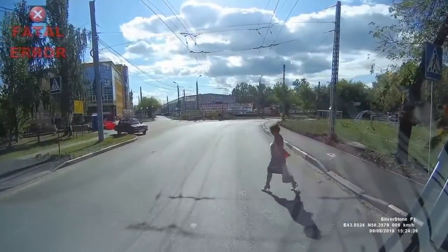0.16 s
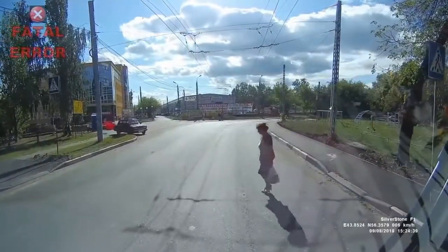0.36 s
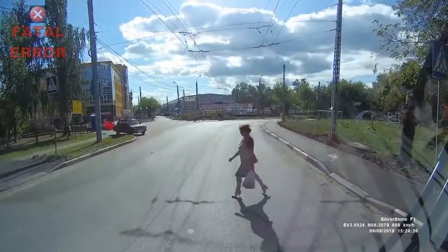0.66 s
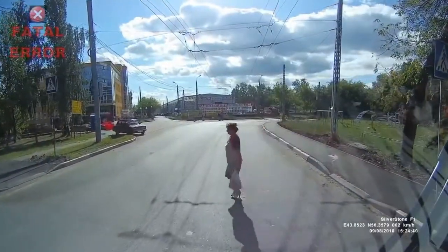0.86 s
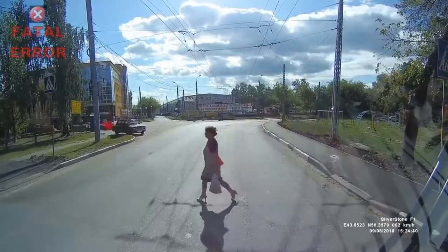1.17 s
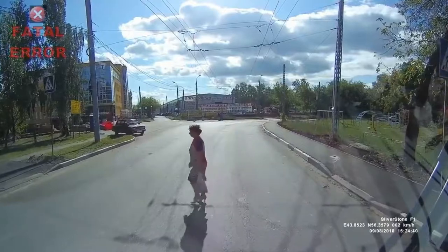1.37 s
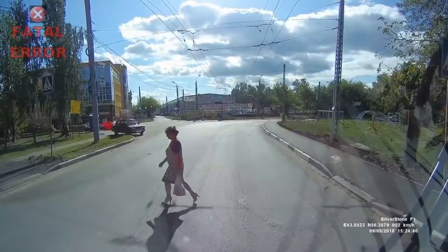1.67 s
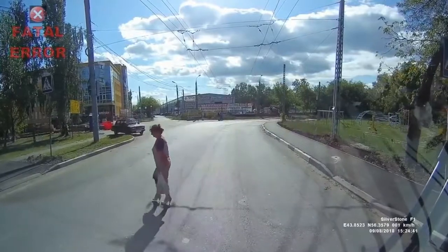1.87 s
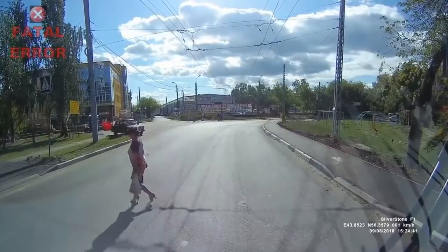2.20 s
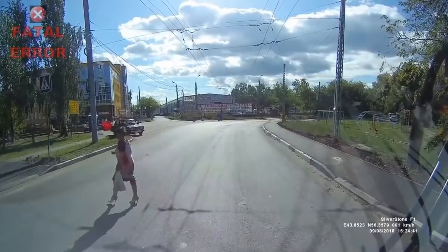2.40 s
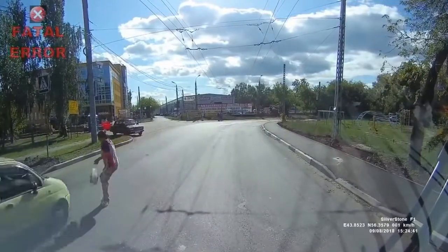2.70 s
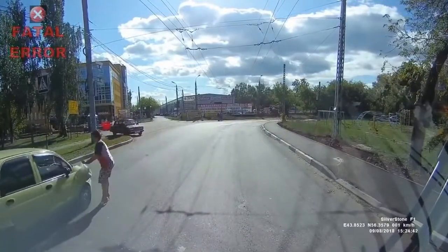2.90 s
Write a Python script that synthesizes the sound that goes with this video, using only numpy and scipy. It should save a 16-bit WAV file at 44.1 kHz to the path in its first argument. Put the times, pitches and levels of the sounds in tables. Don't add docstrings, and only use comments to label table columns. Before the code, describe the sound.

Skidding car tyres screech in stuttering bursts over the low, lumpy idle of a vehicle cab.

```python
import sys
import numpy as np
from scipy import signal
from scipy.fft import rfft, irfft, next_fast_len
from scipy.io import wavfile
from scipy.ndimage import uniform_filter1d, map_coordinates

SR = 44100
rng = np.random.default_rng(int(sys.argv[2]) if len(sys.argv) > 2 else 0)


def voltage_ratio(decibels):
    exponent = np.asarray(decibels, float) / 20
    return 10 ** exponent


def master(y):
    cut = np.clip(np.atleast_2d(y).T, -1, 1)
    pcm = np.round(cut * 32767)
    wavfile.write(sys.argv[1], SR, pcm.astype(np.int16))


N = 134505
T = np.arange(N) / SR


def unit(x):
    return x / np.sqrt(np.mean(np.abs(x) ** 2) + 1e-20)


def along(points, hz):
    f, db = np.transpose(points)
    return voltage_ratio(np.interp(np.log(hz + 1), np.log(f + 1), db, -120, -120))


def curves(rows):
    s, *columns = np.transpose(rows)
    return [np.interp(T, s, column) for column in columns]


def wobble(rate):
    return map_coordinates(rng.standard_normal(4000), [T * np.clip(rate, .1, 1200)])


def filtered(x, response):
    m = next_fast_len(N + SR // 2)
    return irfft(rfft(x, m) * response(np.fft.rfftfreq(m, 1 / SR)), m)[:N]


def noise(spectrum):
    return unit(filtered(rng.standard_normal(N), lambda f: along(spectrum, f)))


# f/Hz, level/dB (per Hz)
HUM_COLOUR = [(30, -6), (60, 0), (200, -3), (260, -15)]


def hum(load_db):
    return voltage_ratio(-50 + 2.1 * load_db) * noise(HUM_COLOUR)


def knock():
    start_s, level_db, pitch_hz, t60_s = .505, -28, 289, 0.083
    t = np.clip(T - start_s, 0, None)
    partials = np.sin(2 * np.pi * pitch_hz * t) + 0.58 * np.sin(2 * np.pi * 1.6 * pitch_hz * t)
    return voltage_ratio(level_db - 60 * t / t60_s) * partials * (1 - np.exp(-t / 0.0035))


# f/Hz, level/dB (per Hz)
INTAKE_COLOUR = [(200, -17), (300, -2), (700, 3), (1000, -11), (1400, -30.5)]


def intake(load_db):
    return voltage_ratio(-60.5 + 3.3 * load_db) * noise(INTAKE_COLOUR)


# f/Hz, level/dB (per Hz)
ROAR_COLOUR = [(130, -21.5), (220, -12), (257, -15), (389, -9.5), (464, -18), (979, -12.5), (1230, -9.5),
               (1630, -16.5), (2300, -33), (2990, -72.5), (5060, -120)]


def roar(count, load_db):
    pulse = 1 + 0.14 * np.cos(2 * np.pi * (count - 0.74))
    return voltage_ratio(-46.5 + 1.26 * load_db + 1.3 * wobble(12)) * pulse * noise(ROAR_COLOUR)


# f/Hz, level/dB (per Hz)
CLATTER_COLOUR = [(1900, -43), (2350, -12.5), (2700, -3.2), (4400, -3.5), (4700, -11), (6500, -23),
                  (8300, -21), (8600, -56)]
# t/s, level/dB (peak)
LOUD_TAPS = [
    (0.6963, -49),
    (0.8185, -35.5),
    (0.9403, -59.5),
    (1.1004, -52.5),
]


def clatter(count, load_db):
    pulse = 1 + 0.25 * np.cos(2 * np.pi * (count - 0.74))
    taps = sum(voltage_ratio(db + 44) * np.exp(-np.abs(T - s - .004) / .007) for s, db in LOUD_TAPS)
    return voltage_ratio(-61 + load_db + 1.5 * wobble(10)) * (pulse + taps) * noise(CLATTER_COLOUR)


def boom(rate, count, load_db):
    resonance_hz, width_hz, peak_db = 43, 4.6, 7
    swell_db = peak_db * np.exp(-((rate - resonance_hz) / width_hz) ** 2)
    level_db = -37 + 0.45 * load_db + swell_db + .6 * wobble(5)
    return -voltage_ratio(level_db) * np.sqrt(2) * np.cos(2 * np.pi * count)


# f/Hz, width/Hz, level/dB
PIPE_MODES = [(164, 14, 1), (200, 12, 0), (390, 70, -24)]


def pipe_ring(f):
    delay_s, total = .0096, 0
    for k, (centre, width, db) in enumerate(PIPE_MODES):
        total = total + (-1) ** k * voltage_ratio(db) * 1j * f * width / (centre ** 2 - f * f + 1j * f * width)
    return np.exp(-2j * np.pi * f * delay_s) * total


def puff_pulse(f):
    return np.exp(-(f / 135) ** 2) * f * f / (f * f + 40 ** 2)


def rebound(f):
    return 1j * f / (118 ** 2 - f * f + 1j * f * 35)


def exhaust(rate, count, load_db):
    at = np.flatnonzero(np.diff(np.floor(count))) + 1
    weak = np.floor(count[at]) % 2 == 1
    size = voltage_ratio(.7 * rng.standard_normal(200)[:len(at)])
    above_idle = rate[at] - rate[0]
    weak_puff = np.clip(.22 + .02 * above_idle, 0, 1)
    puffs, rings = np.zeros(N), np.zeros(N)
    puffs[at] = -size * voltage_ratio(-0.18 * above_idle) * np.where(weak, weak_puff, 1)
    rings[at] = size * voltage_ratio(-0.26 * above_idle) * np.where(weak, .3, 1)
    mix = voltage_ratio(-40) * unit(filtered(puffs, puff_pulse))
    mix = mix + voltage_ratio(-40) * unit(filtered(rings, pipe_ring))
    mix = mix + voltage_ratio(-44) * unit(filtered(puffs, rebound))
    return voltage_ratio(0.12 * load_db) * filtered(mix, lambda f: 1 / (1 + (f / 450) ** 4))


# t/s, f/Hz (firings)
BLIP = [
    (1.42, 24.9),
    (1.618, 31.5),
    (1.718, 36.8),
    (1.804, 41.0),
    (2.0, 43.9),
    (2.182, 42.1),
    (2.378, 36.5),
    (2.446, 33.9),
    (2.704, 28.5),
    (3.05, 25.5),
]
# t/s, level/dB
WORK = [
    (0, 1.5),
    (1.4, 1.5),
    (1.6, 4),
    (1.78, 6),
    (2.0, 6.5),
    (2.2, 4),
    (2.4, 3.5),
    (2.7, -0.5),
    (3.05, 4),
]


def engine():
    idle_hz, first_firing_s = 25.098, .0693
    (rate,), (load_db,) = curves(BLIP), curves(WORK)
    rate = np.where(T < BLIP[0][0], idle_hz, rate)
    count = np.cumsum(rate) / SR
    count = count - count[round(first_firing_s * SR)]
    air = hum(load_db) + intake(load_db)
    works = roar(count, load_db) + clatter(count, load_db)
    return air + works + boom(rate, count, load_db) + exhaust(rate, count, load_db)


OVERTONE_LEVELS = [-25.5, -39]


def tyre(rows, width_hz, wander_hz, spread):
    hz, db = curves(rows)
    grip = voltage_ratio(db) * (T > rows[0][0]) * (T <= rows[-1][0])

    def flutter(rate):
        return wobble(rate) + 1j * wobble(rate)

    phases = []
    for side in (-1, 1):
        patch_hz = hz + side * spread * 55 + wander_hz * wobble(45)
        phases.append(2 * np.pi * np.cumsum(patch_hz) / SR)
    tone = unit(sum(np.real((1.2 + flutter(width_hz)) * np.exp(1j * phase)) for phase in phases))
    for k, level_db in enumerate(OVERTONE_LEVELS, start=2):
        rough = flutter(2.2 * k * width_hz)
        tone = tone + voltage_ratio(level_db) * np.real(rough * np.exp(1j * k * phases[0]))
    return grip * tone, grip


# f/Hz, level/dB (per Hz)
SCRUB_COLOUR = [(290, -69.5), (500, -32.5), (717, -39), (962, -23), (1040, -18.5), (1200, -6.5),
                (1400, -3.5), (2100, -40.5), (2730, -74), (4620, -120)]


def scrub(force):
    return force * voltage_ratio(-5 + 1.7 * wobble(40)) * noise(SCRUB_COLOUR)


# f/Hz, level/dB (per Hz)
GRIT_COLOUR = [(1260, -33.5), (2150, -20), (2510, -5.5), (2880, 3.5), (3580, -12.5), (3980, -7),
               (4440, -14.5), (5770, -48.5), (9770, -120)]


def grit(force):
    return np.abs(force) ** 0.77 * voltage_ratio(-28.5 + wobble(25)) * noise(GRIT_COLOUR)


# t/s, f/Hz, level/dB
FAR_TYRE = [
    (2.05, 1400, -38.5),
    (2.1, 1350, -24),
    (2.17, 1340, -20),
    (2.21, 1380, -28.5),
    (2.4, 1420, -54),
    (2.43, 1400, -18.5),
    (2.6, 1390, -17.5),
    (2.68, 1420, -33.5),
    (2.77, 1400, -24.5),
    (3.05, 1405, -21.5),
]
# t/s, f/Hz, level/dB
NEAR_FIRST_GRIP = [
    (2.235, 1480, -38.5),
    (2.255, 1363, -19),
    (2.275, 1288, -10.5),
    (2.292, 1297, -21.5),
    (2.31, 1190, -10.5),
    (2.355, 1160, -20),
    (2.392, 1166, -10.5),
    (2.42, 1234, -20),
    (2.47, 1230, -32),
]
# t/s, f/Hz, level/dB
NEAR_SECOND_GRIP = [
    (2.61, 1205, -35.5),
    (2.63, 1205, -16),
    (2.67, 1204, -18),
    (2.76, 1286, -19),
    (2.84, 1250, -33.5),
    (2.875, 1263, -19),
    (2.905, 1070, -28.5),
    (2.935, 860, -32),
    (2.95, 830, -43.5),
]


def skid():
    far, far_grip = tyre(FAR_TYRE, width_hz=130, wander_hz=30, spread=.8)
    first, first_grip = tyre(NEAR_FIRST_GRIP, width_hz=90, wander_hz=20, spread=.1)
    second, second_grip = tyre(NEAR_SECOND_GRIP, width_hz=105, wander_hz=25, spread=.3)
    smooth_s = 0.071
    force = uniform_filter1d(far_grip + first_grip + second_grip, size=int(smooth_s * SR))
    return far + first + second + scrub(force) + grit(force)


def scene():
    return (knock() + engine() + skid())[None]


def squeeze(x):
    ceiling = .68
    level = uniform_filter1d(np.abs(signal.hilbert(x, next_fast_len(N))[:N]), size=60)
    return x / (1 + (level / ceiling) ** 4) ** (1 / 4)


# low f/Hz, high f/Hz, reluctance [1]
SHY_BANDS = [(4600, 4800, -.9), (4800, 5200, 0), (5200, 5700, 0), (5700, 6300, -.1), (6300, 6900, .4),
             (6900, 7500, 1.5), (7500, 8300, 1.6)]
SHUT_TIMES = [2.25, 2.368]


def treble_gate(x):
    top_hz, shut_hz, shut_half_s = 4600, 3900, .02
    fade_out = np.clip((N - np.arange(N)) / 90, 0, 1)
    hz, t, z = signal.stft(x * fade_out, SR, nperseg=2048)

    def band_db(low, high):
        power = np.abs(z[(hz > low) & (hz < high)]) ** 2
        return 10 * np.log10(np.sum(power, axis=0) + 1e-12)

    bright = band_db(top_hz, 7000)
    busy = np.clip(band_db(900, 1800) + 34, 0, None)
    urge = (bright - np.median(bright)) / 4.5 - busy / 6 + .7 * rng.standard_normal(len(t))
    keep = (hz < top_hz)[:, None] * np.ones(len(t))
    for low, high, reluctance in SHY_BANDS:
        is_open = urge + .7 * rng.standard_normal(len(t)) > reluctance
        keep = keep + ((hz >= low) & (hz < high))[:, None] * is_open
    in_dropout = np.min(np.abs(t[:, None] - SHUT_TIMES), axis=1) < shut_half_s
    keep = keep * ~((hz > shut_hz)[:, None] & in_dropout)
    return signal.istft(z * keep, SR, nperseg=2048)[1][:N]


def low_pass(x):
    return signal.sosfilt(signal.butter(12, 8400, fs=SR, output="sos"), x)


def record(dry):
    mix = treble_gate(squeeze(dry[0]))[None]
    return low_pass(mix)


dry = scene()
out = record(dry)
master(out)
```